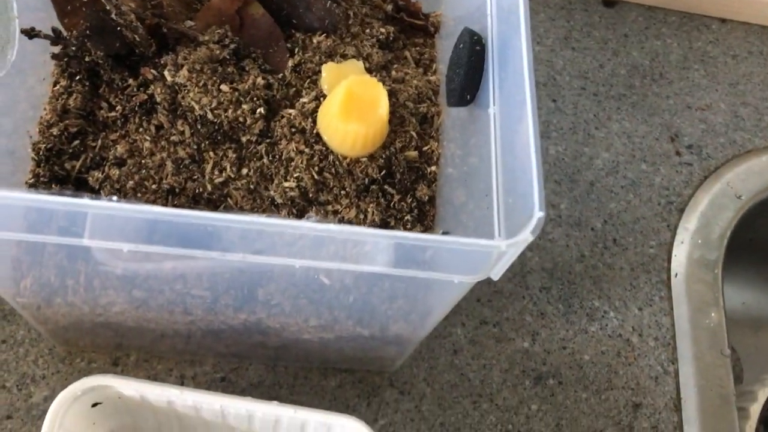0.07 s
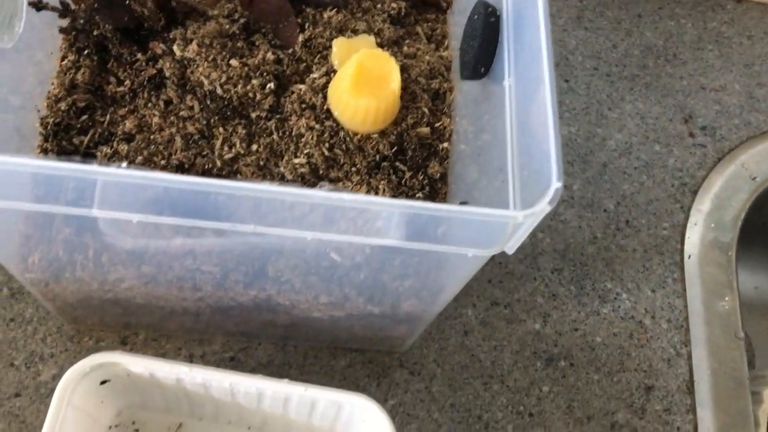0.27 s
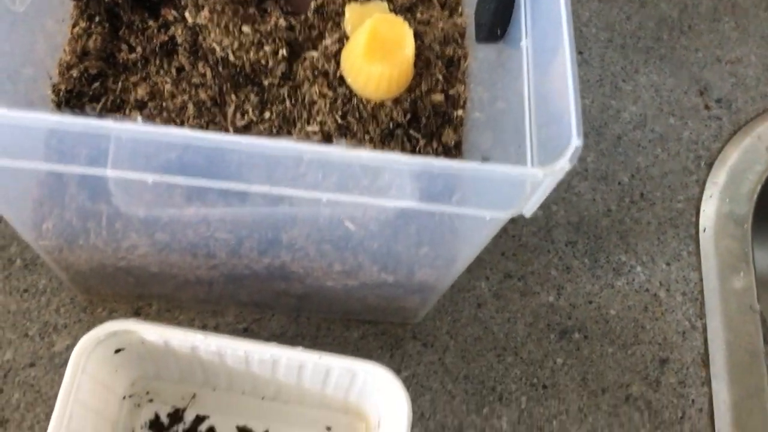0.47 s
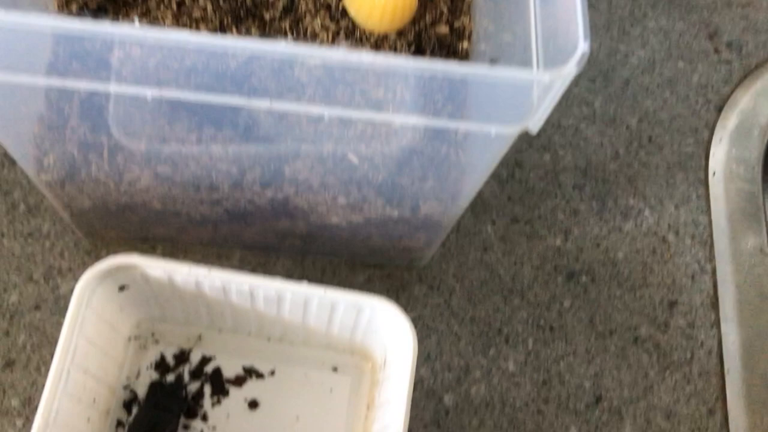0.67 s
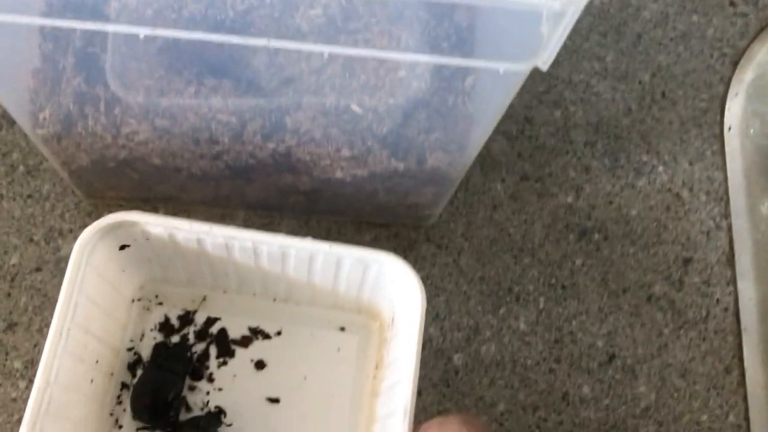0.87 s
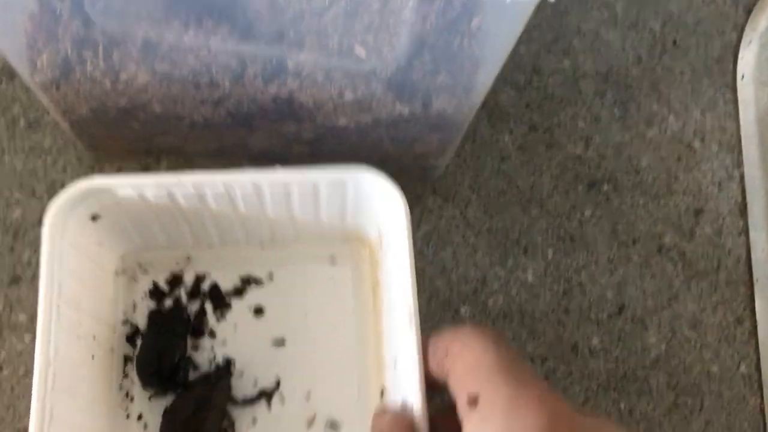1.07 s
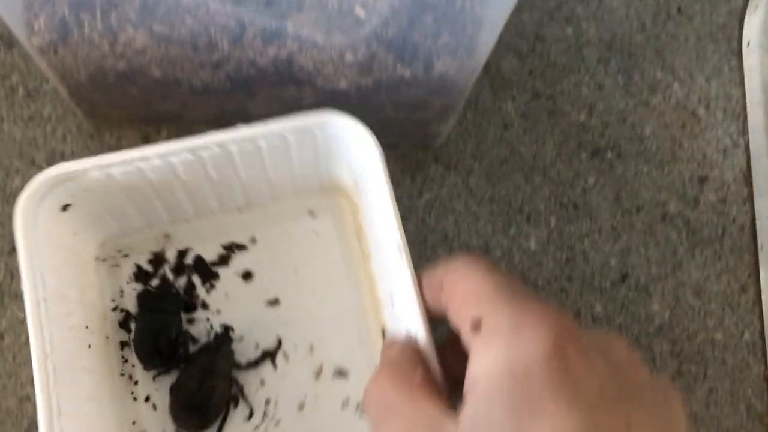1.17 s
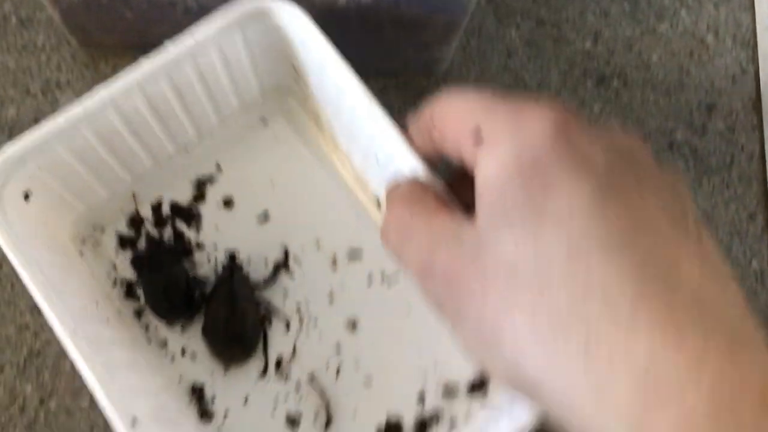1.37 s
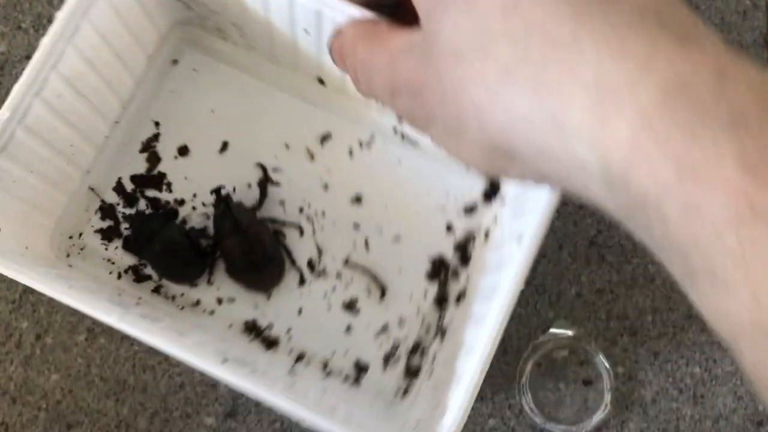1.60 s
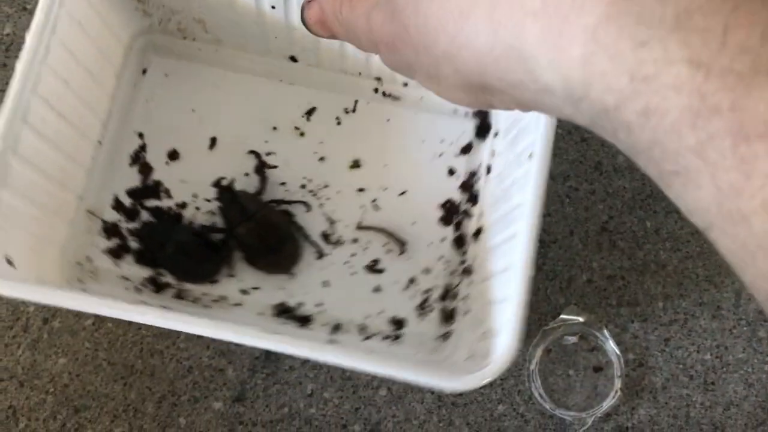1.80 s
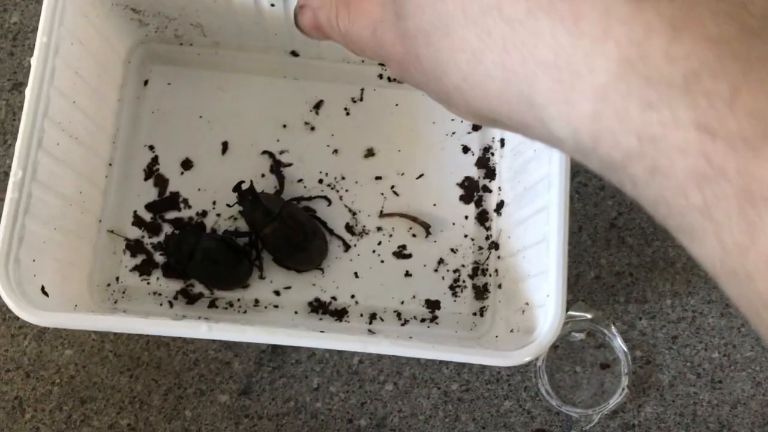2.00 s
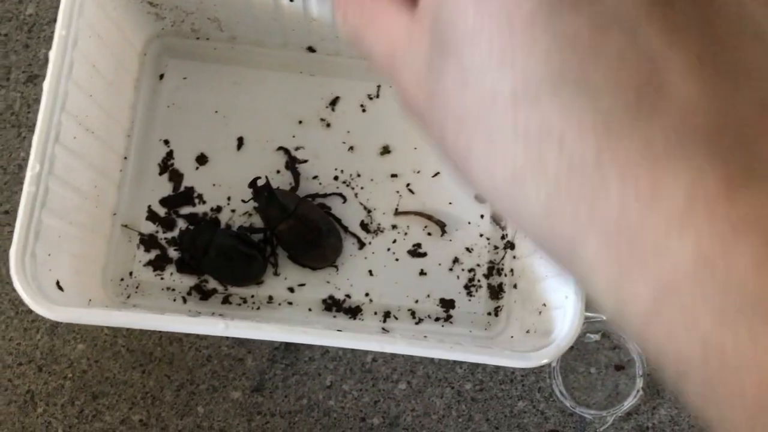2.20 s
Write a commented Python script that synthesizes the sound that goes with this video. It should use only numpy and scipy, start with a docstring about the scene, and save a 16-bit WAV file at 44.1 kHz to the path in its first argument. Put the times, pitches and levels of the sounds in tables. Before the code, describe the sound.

Close up in a small room with a faint hum, plastic clacks several times. After a brief lull, a light plastic tray is dragged across a gritty countertop in uneven strokes, with sharp little ticks and one soft bump.

```python
"""Hollow plastic knocks and clacks on a kitchen counter, over a faint appliance hum.
Then a thin plastic tray is pulled across the gritty top in six strokes. Grit under its base
makes the walls ring and the tray's floor rumble; coarse grains catch and tick.
The tray bumps once as it is turned, with a few fainter bumps around it. The room is small and live."""
import sys
import numpy as np
from scipy import signal
from scipy.fft import rfft, irfft
from scipy.io import wavfile

SR = 44100
rng = np.random.default_rng(int(sys.argv[2]) if len(sys.argv) > 2 else 0)


def transcribe(signal):
    """Save signal, clipped to [-1, 1], as a 16-bit WAV file at the path in sys.argv[1]."""
    frames = np.atleast_2d(signal).T
    limited = np.clip(frames, -1, 1)
    pcm = np.round(limited * 32767).astype(np.int16)
    wavfile.write(sys.argv[1], SR, pcm)


N = 99225
TIME_S = np.arange(N) / SR


def from_db(db):
    """Decibels to gain."""
    return 10 ** (np.asarray(db) / 20)


def rms_one(x):
    """Scale to rms 1."""
    return x / np.sqrt(np.mean(x ** 2) + 1e-20)


def at_hz(points, hz):
    """Interpolate a table over log frequency."""
    freqs_hz, values = np.transpose(points)
    return np.interp(np.log(np.maximum(hz, 1)), np.log(freqs_hz), values)


def through(x, response):
    """Convolve, keeping the input length."""
    return signal.fftconvolve(x, response)[:len(x)]


def colour(x, curve, size=8192):
    """Minimum-phase filter; curve rows: freq_hz, gain_db."""
    bins_hz = np.arange(size // 2 + 1) * SR / size
    cepstrum = irfft(np.log(from_db(at_hz(curve, bins_hz))))
    cepstrum[1:size // 2] *= 2
    cepstrum[size // 2 + 1:] = 0
    return through(x, irfft(np.exp(rfft(cepstrum))))


def cut(x, hz, kind, order=2):
    """Butterworth low- or high-pass."""
    sos = signal.butter(order, np.clip(hz, 10, .45 * SR), kind, fs=SR, output="sos")
    return signal.sosfilt(sos, x + 1e-18)


def ringing(modes):
    """0.5 s of decaying sines, alternating in sign."""
    t = TIME_S[:SR // 2]
    return sum((-1) ** k * from_db(db - 60 * t / t60_s) * np.sin(2 * np.pi * hz * t)
               for k, (hz, db, t60_s) in enumerate(modes))


def dense_ring(decay, onset_s=0):
    """Overlapping modes: noise decaying band by band, unit gain per band."""
    t = TIME_S[:SR // 2]
    white = rfft(rng.standard_normal(len(t)))
    hz = np.arange(len(white)) * SR / len(t)
    edges_hz = np.geomspace(70, 18000, 20)
    attack = np.minimum(t / (onset_s + 1e-6), 1) ** 2
    out = 0
    for low, high in zip(edges_hz, edges_hz[1:]):
        t60_s = at_hz(decay, np.sqrt(low * high))
        band = irfft(white * ((hz >= low) & (hz < high)), len(t))
        band *= attack * from_db(-60 * t / t60_s)
        out += band * np.sqrt(2 * (high - low) / SR / np.sum(band ** 2))
    return out


def drift(rate_hz):
    """Linear glide between unit-normal random values."""
    knots = rng.standard_normal(200)
    return np.interp(TIME_S * rate_hz, np.arange(len(knots)), knots)


def add(out, start_s, sound):
    """Mix a sound in at start_s."""
    i = int(start_s * SR)
    out[i:i + len(sound)] += sound[:N - i]


def background():
    """Steady low rumble, thin hiss and appliance hum."""
    # noise spectrum: freq_hz, gain_db
    air_colour = [(20, -37.5), (32, -19), (46, -6), (65, -2.5), (100, -4.5), (150, -11), (220, -16),
                  (400, -20.5), (800, -25), (1600, -33), (4000, -37.5), (10500, -43), (15000, -37)]
    # hum lines: pitch_hz, rms_db
    hum_lines = [(49, -65.5), (81, -71.5), (149.7, -63)]
    air = rms_one(colour(rng.standard_normal(N + SR), air_colour)[SR:])
    hum = sum(np.sqrt(2) * from_db(db) * np.sin(2 * np.pi * (hz * TIME_S + rng.random()))
              for hz, db in hum_lines)
    return from_db(-62) * air + hum


def knocks():
    """Contacts ring the plastic and thud the counter; hard ones crack, soft ones sound hollow."""
    # contacts: start_s, gain_db, lowpass_hz, highpass_hz, hollow_db, crack_db
    contacts = [(0.0675, -1.5, 12200, 900, -19, 7), (0.0684, 2, 3000, 111.4, -2, -1.5),
                (0.0712, -16, 6040, 200, 1, 3), (0.153, -25.5, 5000, 610, -8, 6),
                (0.181, -4, 12400, 2360, -6, 7.5), (0.1868, -2, 2880, 220, -1.5, 5),
                (0.2068, -13, 4000, 305, -19, 15.5), (0.238, -19.5, 4000, 1190, -1, -3),
                (0.2682, -11.5, 11000, 3100, -14, 4), (0.2684, -22, 2500, 199, -23, -6),
                (0.3198, -21, 4000, 400, 0, 10.5), (0.3348, -15.5, 1550, 195.4, 9.5, -10),
                (0.411, -30.5, 4500, 1500, -5, -10)]
    # dense ring spectrum: freq_hz, gain_db
    ring_colour = [(90, -8), (220, 9), (450, 9), (600, -2), (1000, 6), (1700, 2), (2200, 10.5), (2800, 3),
                   (3600, 3), (4600, 4.5), (5050, -4), (6000, -5.5), (10500, -15.5), (13000, -12.5),
                   (14800, -7), (16000, -20.5)]
    # dense ring decay: freq_hz, t60_s
    ring_decay = [(200, .06), (700, 0.031), (2000, 0.04), (6000, 0.034), (15000, .028)]
    # clear plastic modes, hollow ring, counter thud: pitch_hz, gain_db, t60_s
    plastic_modes = [(222.5, -41, .18), (362, -38.5, 0.16), (404.7, -42.5, 0.21), (491, -33, 0.061),
                     (629.4, -42.5, 0.26), (1252, -36, .08), (1565, -35, 0.1), (2060, -25, 0.022),
                     (2432, -36, .035), (3223, -33.5, 0.035), (3434, -32, 0.035), (4165, -33.5, .025)]
    hollow_modes = [(1210, -24, 0.017), (1446, -13, 0.015), (1893, -26, 0.027)]
    thud_modes = [(86, -54.5, 0.4), (109, -52, 0.14)]
    out = np.zeros(N)
    for start_s, gain_db, lowpass_hz, highpass_hz, hollow_db, crack_db in contacts:
        body = colour(dense_ring(ring_decay), ring_colour)
        body += ringing(plastic_modes + thud_modes)
        body += from_db(hollow_db) * ringing(hollow_modes)
        body = colour(body, [(4500, 0.0023), (9000, crack_db)])  # treble shelf
        body = cut(body, lowpass_hz, "low", order=1)
        add(out, start_s, from_db(gain_db) * cut(body, highpass_hz, "high"))
    return out


def grit(impacts_per_s=4200, spread_db=3, judder_db=1.5, judder_hz=69):
    """Dense, uneven micro-impacts, juddering as the tray sticks and slips."""
    sizes = from_db(spread_db * np.minimum(rng.exponential(1, N), 4))
    signs = rng.choice([-1, 1], N)
    judder = rms_one(cut(rng.standard_normal(N), judder_hz, "low"))
    hits = rng.random(N) < impacts_per_s / SR
    return sizes * signs * hits * from_db(judder_db * judder)


def wall(impacts, modes, swing_db=3.5, swing_hz=14):
    """Wall modes rung by grit; each swells and fades as the contact points shift. Rms 1."""
    out = np.zeros(N)
    for k, mode in enumerate(modes):
        drive = impacts * from_db(swing_db * drift(swing_hz))
        out += (-1) ** k * through(drive, ringing([mode]))
    return rms_one(out)


def scrape():
    """Grit drives the tray's base and walls; the balance changes per stroke."""
    # one envelope per stroke: time_s, gain_db
    strokes = [
        [(0.91, -72), (0.922, -52.5), (0.934, -46), (0.994, -51), (1.1, -72)],
        [(1.11, -71), (1.148, -56.5), (1.192, -54.5), (1.222, -41.5), (1.25, -38), (1.284, -42), (1.294, -38),
         (1.304, -47.5), (1.314, -41.5), (1.366, -42.5), (1.372, -47), (1.42, -52.5), (1.448, -52)],
        [(1.474, -55), (1.494, -40), (1.51, -38), (1.524, -44.5), (1.542, -43.5), (1.612, -44), (1.616, -44.5),
         (1.684, -49), (1.7, -61)],
        [(1.705, -70), (1.719, -51), (1.725, -49), (1.743, -70.5), (1.781, -59.5), (1.79, -67)],
        [(1.795, -81), (1.803, -49), (1.819, -45.5), (1.841, -42), (1.871, -57.5), (1.889, -43.5),
         (1.921, -39.5), (1.929, -46), (1.977, -58), (2.01, -81)],
        [(2.04, -78.5), (2.064, -72), (2.084, -69), (2.12, -102)],
    ]
    # how each stroke bears on the counter:
    # rasp_db, rumble_db, low_wall_db, main_wall_db, high_wall_db, hiss_db
    bearings = [(-1, -2, -5, -6, -5.5, -7.5), (-0.5, -18.5, -1, 0.5, -2, -8),
                (-2.5, -4.5, -6.5, -8, 0, -12), (-2.5, -1, -1.5, -14, -1, -5),
                (-1, 3.5, -6, -30, -6.5, -13.5), (-9, -9, -27, -5, -9, 10.5)]
    # spectra of rasp, base rumble, contact hiss: freq_hz, gain_db
    rasp_colour = [(200, -5.5), (420, -5), (580, -12), (900, -23.5), (1500, -1.5), (2100, 9), (3200, -4),
                   (4500, 0.5), (5000, -6), (5600, -2), (6400, -3.5), (7600, -8.5), (10500, -17),
                   (15500, -21)]
    rumble_colour = [(50, -8.5), (110, 3), (165, 8.5), (205, -7), (250, -3.5), (370, -0.5), (540, -15),
                     (1200, -28)]
    hiss_colour = [(2000, -20), (6200, -1), (7500, -5), (8250, 2), (9000, -3), (10000, -3.5),
                   (10500, -10.5), (12000, -1), (14700, -1), (16000, -17)]
    # wall modes: pitch_hz, gain_db, t60_s
    low_modes = [(766, -11, 0.03), (789, -11.5, 0.023), (1123, 2, 0.017), (1128, -3.5, 0.043),
                 (1235, -7.5, 0.036)]
    main_modes = [(1855, -4, 0.027), (2110, 0, 0.06), (2280, 3, 0.034)]
    high_modes = [(2560, 7, 0.017), (2628, 11.5, 0.016), (3215, 4.5, 0.017), (3437, 4.5, 0.028),
                  (4250, -2.5, 0.038), (4616, -3, 0.056)]
    impacts = grit()
    layers = np.array([from_db(-3.5) * rms_one(colour(impacts, rasp_colour)),
                       from_db(-9.5) * rms_one(colour(impacts, rumble_colour)),
                       from_db(-6.5) * wall(impacts, low_modes),
                       from_db(-9.5) * wall(impacts, main_modes),
                       from_db(-6) * wall(impacts, high_modes),
                       from_db(-7.5) * rms_one(colour(impacts, hiss_colour))])
    out = np.zeros(N)
    for stroke, balance_db in zip(strokes, bearings):
        time_s, gain_db = np.transpose(stroke)
        envelope = from_db(np.interp(TIME_S, time_s, gain_db, left=-np.inf, right=-np.inf))
        out += envelope * (from_db(balance_db) @ layers)
    return out


def grain_ticks():
    """Coarse grains catch under the tray and tick; one tick sounds with the tray's main bump."""
    # catches, and the tick of the main bump at 1.4612 s: start_s, gain_db, highpass_hz
    catches = [(0.934, -38, 5000), (1.148, -30, 6000), (1.248, -30, 600), (1.291, -39, 1000),
               (1.332, -31, 1200), (1.42, -17.5, 6600), (1.4612, -32, 400), (1.49, -22.5, 1790),
               (1.544, -22.5, 2000), (1.562, -24.5, 1800), (1.722, -26.5, 3000), (1.916, -23.5, 1000)]
    # tick decay: freq_hz, t60_s
    tick_decay = [(1000, 0.034), (15000, 0.018)]
    # tick spectrum: freq_hz, gain_db
    tick_colour = [(400, -6), (1500, -24), (2200, 19), (4200, 12), (7000, -2.5), (15000, -5.5)]
    out = np.zeros(N)
    for start_s, gain_db, highpass_hz in catches:
        tick = colour(dense_ring(tick_decay), tick_colour)
        add(out, start_s, from_db(gain_db) * cut(tick, highpass_hz, "high"))
    return out


def tray_bumps():
    """Dull bumps ring the tray's low modes."""
    # bumps: start_s, gain_db
    bumps = [(0.951, -57), (1.461, -39.5), (1.772, -55), (1.806, -50), (1.832, -46)]
    # tray modes: pitch_hz, gain_db, t60_s
    tray_modes = [(257, 0, 0.06), (359, 0, 0.03), (483, -6, 0.063), (830, -4, 0.016)]
    out = np.zeros(N)
    for start_s, gain_db in bumps:
        add(out, start_s, from_db(gain_db) * ringing(tray_modes))
    return out


def room(send):
    """Diffuse reverb of a small live room; bass lasts longest."""
    # reverb decay: freq_hz, t60_s
    room_decay = [(150, 1), (400, 0.521), (1500, 0.33), (4000, 0.26), (8000, .3), (15000, .2)]
    # reverb spectrum: freq_hz, gain_db
    room_colour = [(100, -6.5), (350, -3), (700, -2), (1500, -5.5), (2300, -11.5), (3000, -8), (3800, -4),
                   (4400, -11), (6000, -9.5), (15000, -14.5)]
    response = colour(dense_ring(room_decay, onset_s=0.0073), room_colour)
    return through(send, response)


def scene():
    """Knocks, then the tray, with reverb and background; mono."""
    knocked = from_db(2) * knocks()
    tray = scrape() + grain_ticks() + tray_bumps()
    reverb = room(from_db(-1.5) * knocked + from_db(-5.5) * tray)
    return (knocked + tray + reverb + background())[None]


def record(dry):
    """Deep bass roll-off and steep top cut."""
    highpass_hz, lowpass_hz = 45, 15900
    top_cut = signal.ellip(10, .1, 70, lowpass_hz, fs=SR, output="sos")
    return signal.sosfilt(top_cut, cut(dry, highpass_hz, "high", order=4))


dry = scene()
out = record(dry)
transcribe(out)
```